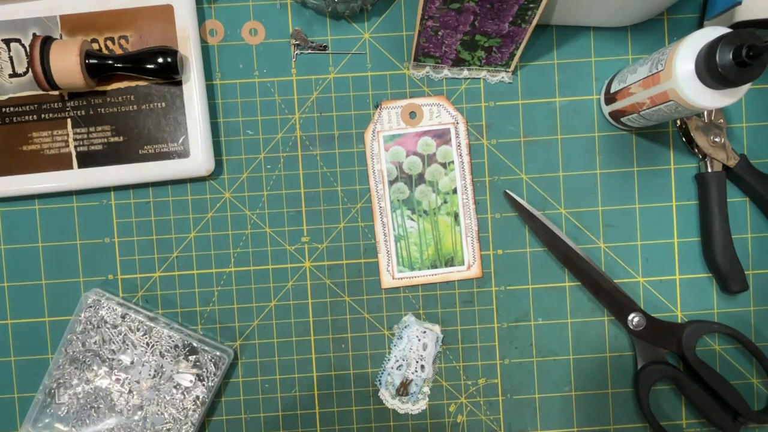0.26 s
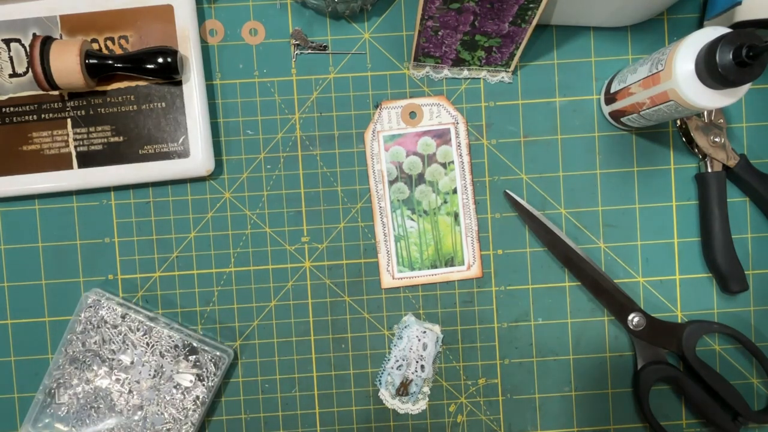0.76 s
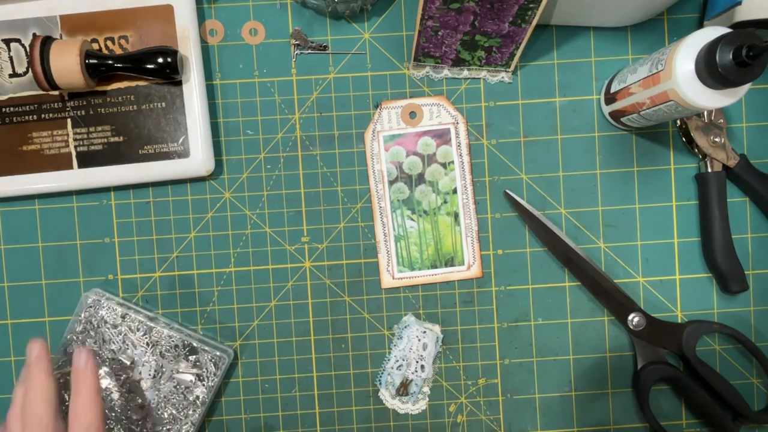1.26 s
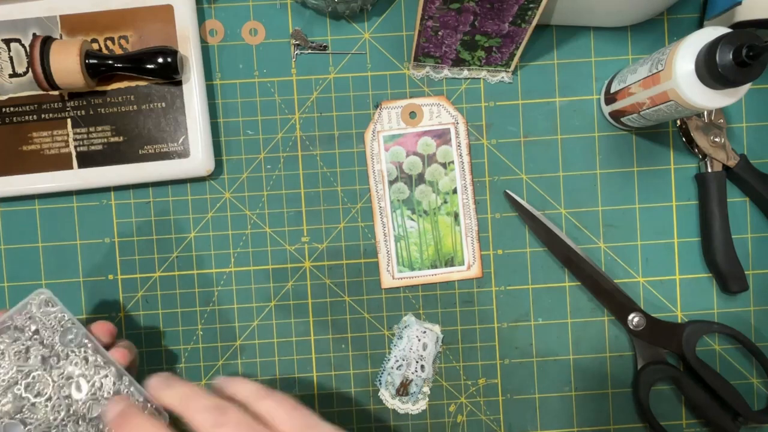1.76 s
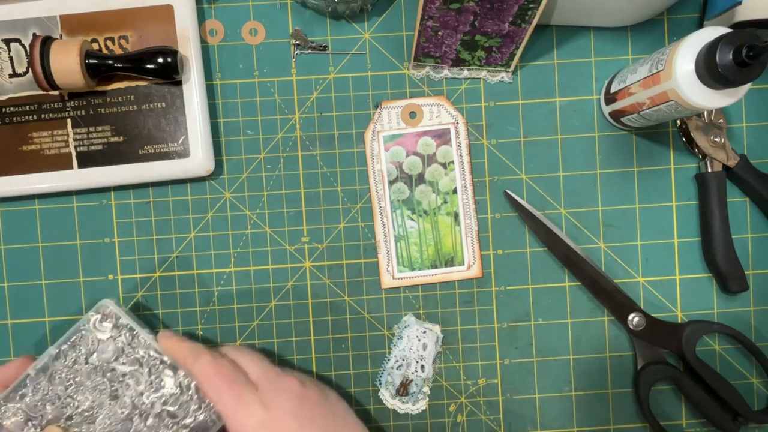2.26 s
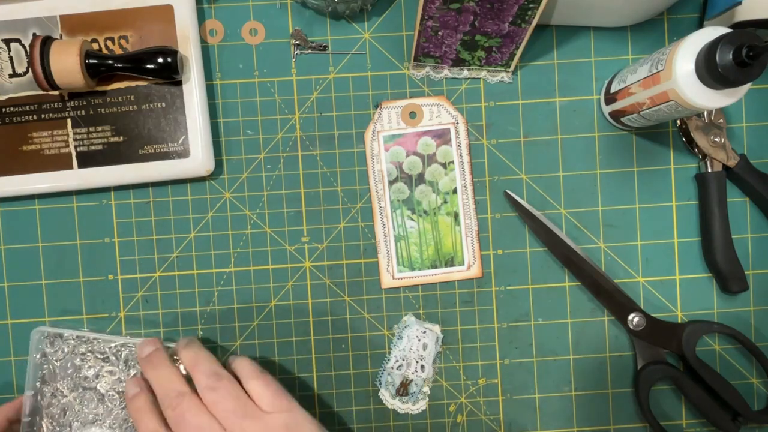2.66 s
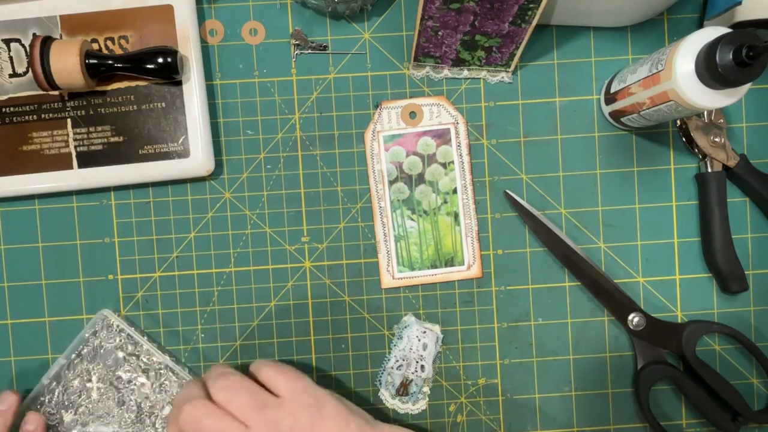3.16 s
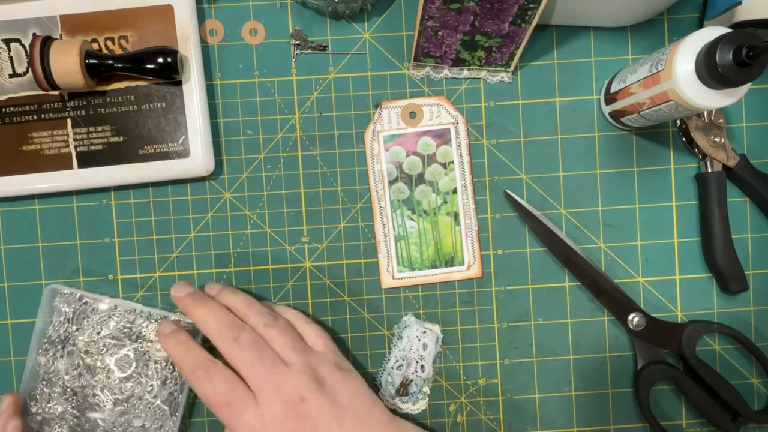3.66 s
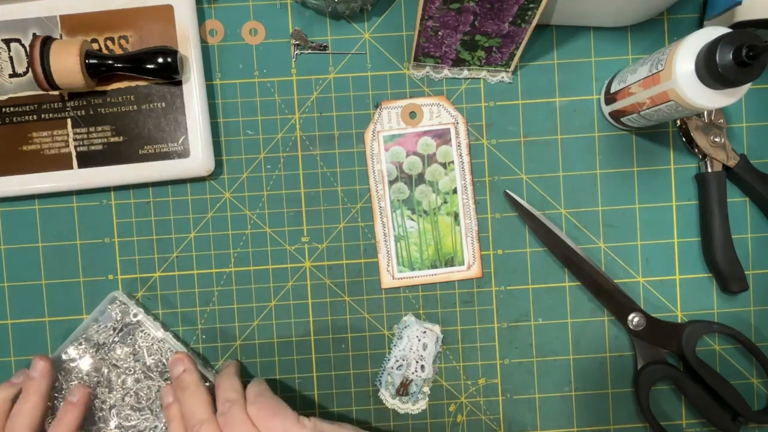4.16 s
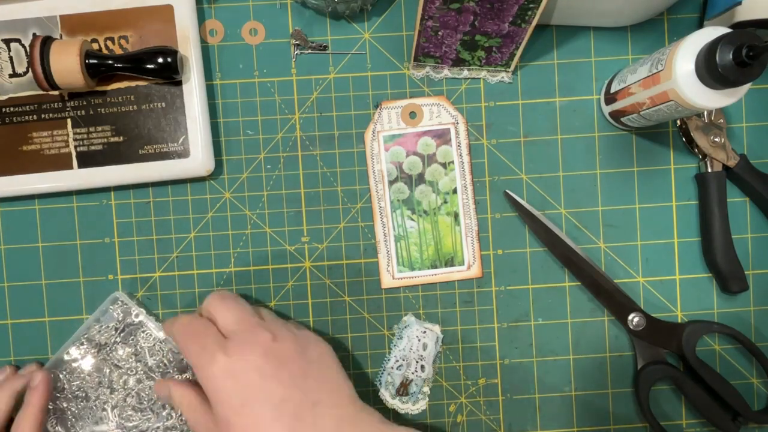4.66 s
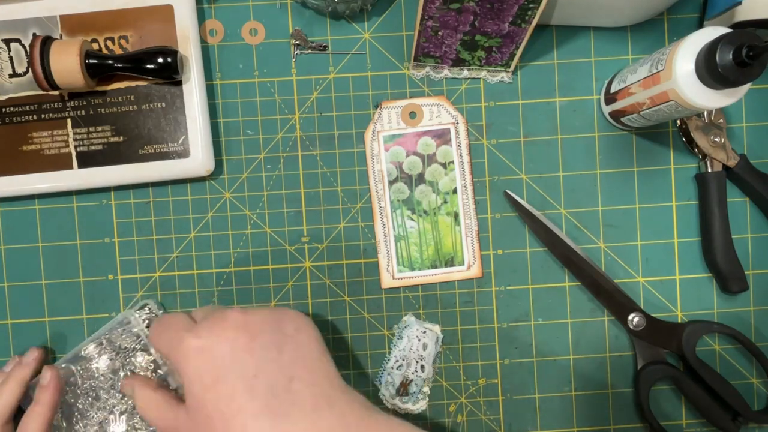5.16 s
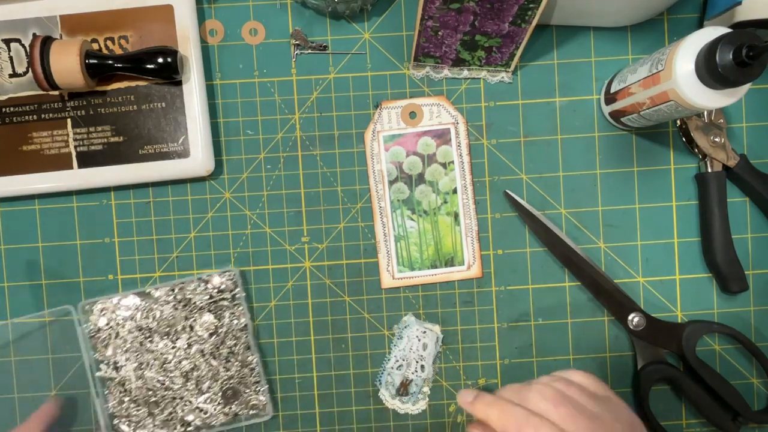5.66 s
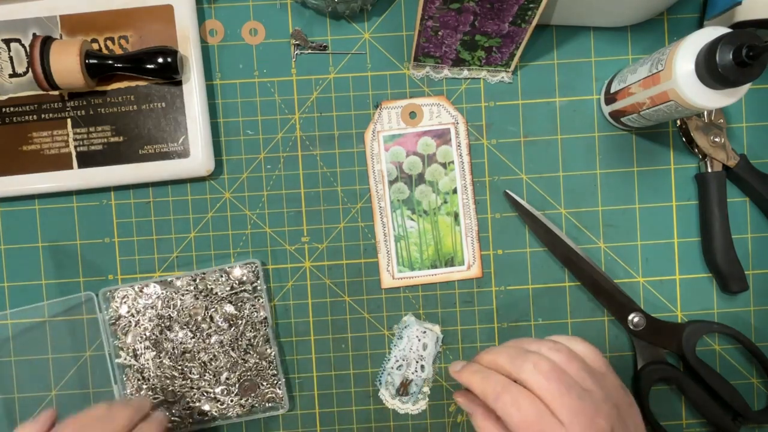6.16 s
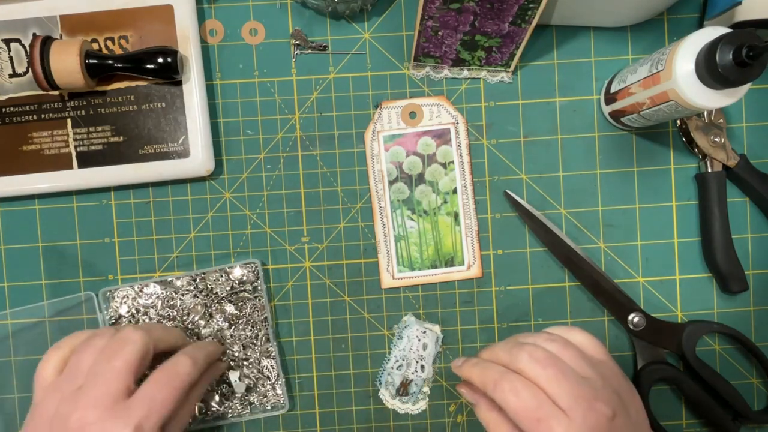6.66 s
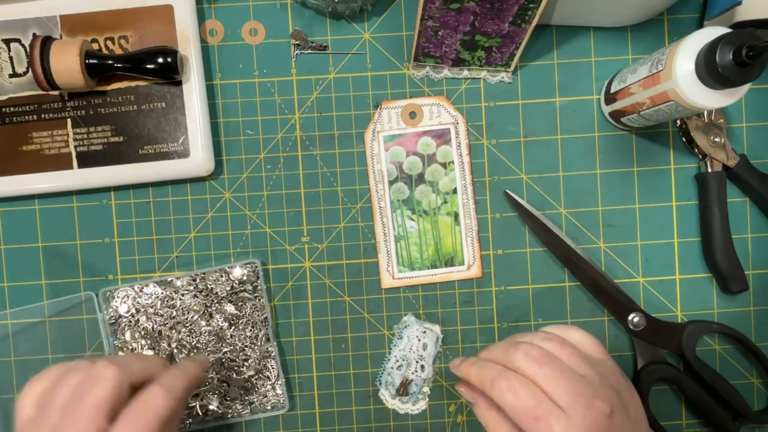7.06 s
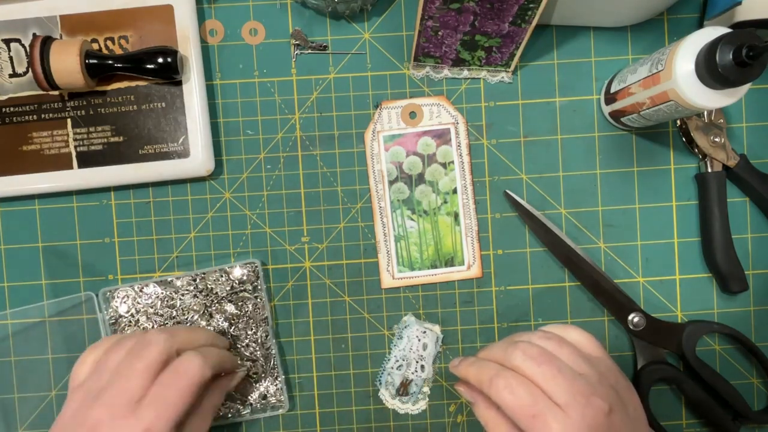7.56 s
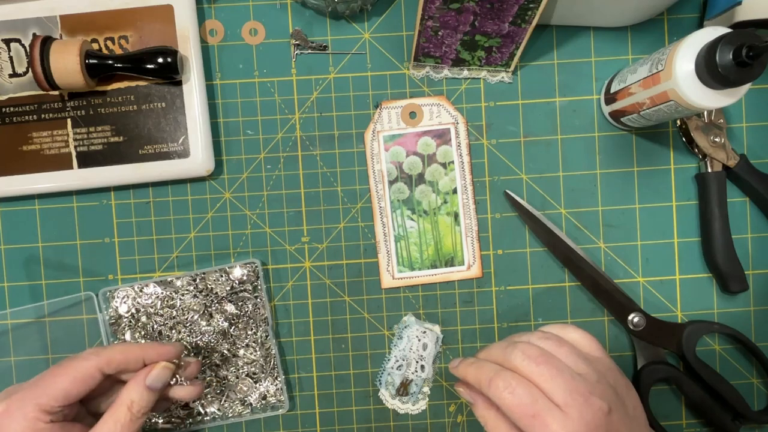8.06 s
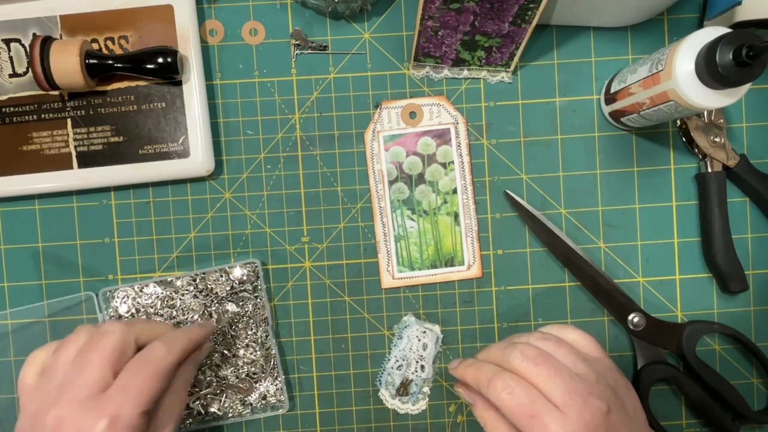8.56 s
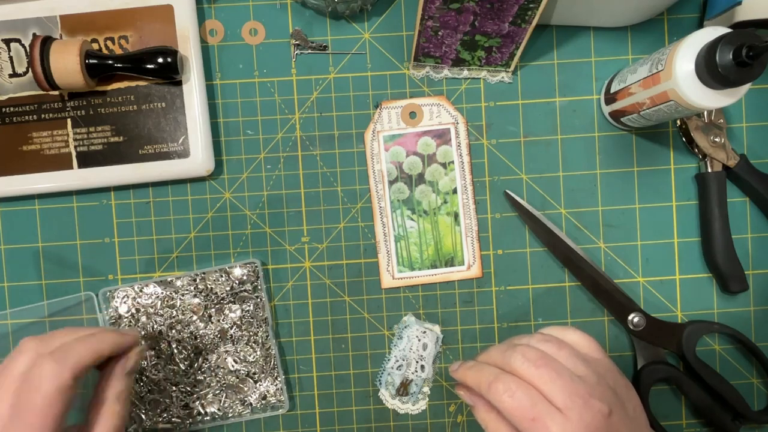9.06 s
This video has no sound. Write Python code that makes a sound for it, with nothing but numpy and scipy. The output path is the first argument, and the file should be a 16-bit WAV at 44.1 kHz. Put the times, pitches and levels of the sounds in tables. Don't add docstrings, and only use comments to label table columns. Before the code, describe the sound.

Close, dry stereo in a small quiet room with low hum and soft table rumble. From 0 to 0.6 s a plastic box scrapes gritty and hollow over a mat, then near quiet. At about 1.4 s it is lifted and shaken: dense metal charms crash against thin walls, loudest around 1.65 and 2.05 s, with buzzing lid hits. It lands at 2.4 to 2.5 s with a hard clack and low thud, and a last edge drops at 2.66 s. From 3 to 4.9 s come faint knocks, ticks and muffled bumps; a sharp snap opens it at 5.05 s. After light handling, fingers rake the heap from 6.3 to 7.55 s in bright, tinkling bursts with high pings and a barely audible squeak near 7 s. Isolated picks and drops click at 7.8, 7.95, 8.27 and 8.54 s, thinning to almost nothing after 9 s. Attacks are slightly smeared and watery.

```python
import sys
import numpy as np
from scipy import signal
from scipy.fft import rfft, irfft, next_fast_len
from scipy.io import wavfile
from scipy.ndimage import uniform_filter1d

SR = 44100
rng = np.random.default_rng(int(sys.argv[2]) if len(sys.argv) > 2 else 0)


def wav_record(signal):
    frames = np.transpose(np.atleast_2d(signal))
    bounded = np.clip(frames, -1, 1)
    quanta = np.round(bounded * 32767).astype(np.int16)
    wavfile.write(sys.argv[1], SR, quanta)


def field_ratio(decibels):
    return 10 ** (np.asarray(decibels, dtype=float) / 20)


N = 410571


def unit(x):
    return x / np.sqrt(np.mean(x ** 2) + 1e-20)


def along(points, hz):
    f, v = np.transpose(points)
    return np.interp(np.log(hz + 1), np.log(f + 1), v)


def level_curve(rows):
    s, db = np.transpose(rows)
    return np.interp(np.arange(N) / SR, s, db)


def coloured(x, spectrum):
    size = next_fast_len(N + 8192)
    points = [(0.79, -120)] + list(spectrum) + [(SR / 2, -120)]
    gain = field_ratio(along(points, np.fft.rfftfreq(size, 1 / SR)))
    return irfft(rfft(x, size) * unit(gain), size)[..., :N]


def contact_grains(per_s, spread_db):
    shared = .62
    hit = rng.random(N) < per_s / SR
    size = rng.standard_normal((3, N))
    both = np.sqrt(shared) * size[0] + np.sqrt(1 - shared) * size[1:]
    uneven = field_ratio(spread_db * np.minimum(rng.exponential(size=N), 4))
    return unit(hit * both * uneven)


def place(start, waves):
    at = start + np.arange(waves.shape[1])
    return np.bincount(at.ravel(), waves.ravel(), N + SR)[:N]


def ring(rows, t60_s, late_s, rise_s, gain_db):
    s, db, hz = np.transpose(rows)[:, :, None]
    t = np.arange(SR // 10) / SR
    decay = field_ratio(db + gain_db - 60 * t / np.clip(t60_s, .005, .3))
    attack = (1 - np.exp(-t / rise_s)) ** 2
    start = np.round((s + late_s) * SR).astype(int)
    return place(start, decay * attack * np.sin(2 * np.pi * hz * t))


# (time [s], level [dB])
STIRRING = [(.7, -77), (1.2, -67.5), (1.55, -51), (2.4, -51.5), (2.7, -60), (3.43, -77), (3.65, -62),
            (4.13, -78.5), (4.68, -65), (4.94, -71), (5.47, -57), (6.38, -77.5), (6.74, -53), (6.98, -67.5),
            (7.42, -58), (8.06, -77.5), (8.73, -68.5), (9.31, -75.5)]
# (peak time [s], level [dB], swell [s], settle [s])
SHAKEN_HEAPS = [(.85, -68.5, 0.011, 0.068), (1.08, -68.5, 0.11, 0.093), (1.246, -55, 0.037, 0.026),
                (1.325, -51, 0.0041, 0.016), (1.378, -40, .008, .012), (1.4, -46, .03, 0.035),
                (1.506, -22.5, 0.013, .023), (1.536, -26.5, 0.014, 0.011), (1.591, -25.5, 0.01, .0092),
                (1.648, -14, .017, 0.029), (1.69, -21, .012, 0.014), (1.736, -25, .007, .011),
                (1.816, -28, 0.008, 0.014), (1.908, -38, 0.0035, 0.0046), (1.945, -30, .006, 0.04),
                (1.993, -29.5, 0.0043, 0.014), (2.064, -14.5, .022, .016), (2.149, -25, 0.039, .018),
                (2.232, -37, 0.006, 0.007), (2.274, -31, 0.0027, .024), (2.302, -35, .0026, 0.022),
                (2.323, -38, 0.0027, .08)]
# (peak time [s], level [dB], wall re metal [dB], swell [s], settle [s])
HANDLED_HEAPS = [(1.415, -49, 8, .015, .012), (2.955, -45.5, -8.5, 0.0056, 0.0077),
                 (3.04, -56, -1, 0.048, 0.097), (3.196, -43, 7, 0.011, 0.01),
                 (3.281, -53.5, 9, .0017, 0.0063), (3.438, -55, 2.5, 0.051, 0.005),
                 (3.538, -49, 0, 0.062, .03), (3.632, -44, -0.5, 0.0042, 0.013),
                 (3.732, -60.5, 1.23, 0.0092, .02), (3.804, -53.5, -2.5, 0.003, 0.044),
                 (3.876, -48.5, 7, 0.0043, 0.0097), (4.007, -38.5, -6.5, 0.0028, 0.0075),
                 (4.095, -52.5, 7, 0.006, 0.0084), (4.476, -31.5, -3.5, 0.0056, 0.0064),
                 (4.529, -55.5, -5.5, 0.036, 0.034), (4.716, -46.5, -4.5, .015, .02),
                 (4.822, -43, 1, 0.0032, 0.013), (4.872, -50.5, 2, 0.009, .013),
                 (5.05, -14, -13, .005, .0068), (5.057, -34, -29, 0.01, 0.019),
                 (5.252, -47.5, -2.5, 0.0024, .042), (5.297, -54, 17, 0.011, 0.011),
                 (5.453, -54.5, -7.5, .05, 0.07), (5.592, -48.5, -9, 0.0087, .016),
                 (5.902, -54, -6.5, 0.042, 0.0084)]
# (peak time [s], level [dB], swell [s], settle [s])
RAKED_HEAPS = [(5.7, -56, .055, 0.041), (6.153, -64, 0.056, 0.044), (6.303, -34, .0051, 0.0079),
               (6.322, -37.5, 0.0076, 0.0077), (6.356, -28, 0.017, 0.023), (6.429, -41, 0.038, 0.006),
               (6.571, -23.5, 0.0069, 0.0089), (6.617, -26, 0.017, 0.016), (6.645, -21, .006, .007),
               (6.665, -24, 0.0088, .025), (6.734, -28.5, .006, .02), (6.775, -35.5, .015, .03),
               (6.835, -44.5, 0.036, 0.028), (6.875, -40.5, 0.0062, .023), (6.934, -43, .011, .0042),
               (7.025, -34.5, .004, 0.0071), (7.068, -36.5, .008, .012), (7.191, -22.5, 0.0091, 0.007),
               (7.23, -28, .02, 0.013), (7.253, -26, .0058, .012), (7.3, -40.5, .015, .0086),
               (7.374, -36, .012, .0095), (7.395, -29.5, 0.0038, 0.0093), (7.425, -36, .025, 0.027),
               (7.488, -31, .0055, .008), (7.53, -33, 0.039, 0.0097), (7.55, -26, 0.0087, .0053)]
# (peak time [s], level [dB], swell [s], settle [s])
PICKED_CHARMS = [(7.642, -42, 0.0098, 0.0052), (7.658, -33, .0039, 0.0062), (7.792, -28.5, 0.0051, 0.0088),
                 (7.954, -31, .003, .006), (8.012, -40, 0.032, 0.0046), (8.043, -50, 0.0052, 0.0035),
                 (8.266, -23, 0.005, 0.006), (8.278, -45.5, 0.016, 0.011), (8.538, -32, 0.0087, .012),
                 (8.7, -35, 0.007, .0076), (8.776, -34.5, .022, .0087), (8.851, -37.5, 0.022, 0.0012),
                 (8.87, -39.5, 0.018, 0.0059), (8.914, -45, .0225, .0023), (8.935, -39, .0086, 0.0067),
                 (9.214, -61, .03, 0.1)]
# (peak time [s], level [dB], swell [s], settle [s])
GRIP_SHIFTS = [(2.886, -57, .03, .008), (3.085, -55.5, 0.0048, .02), (3.769, -60, 0.016, 0.025),
               (3.934, -58.5, 0.034, 0.017), (3.985, -56, .01, .01), (4.14, -57, 0.01, 0.0073),
               (4.258, -62, 0.015, .015), (4.643, -55, .05, 0.04), (4.939, -67, 0.015, 0.018),
               (5.111, -53.5, 0.01, 0.023), (5.765, -56.5, 0.01, .003), (5.903, -47, .003, .004),
               (6.967, -53.5, 0.0058, .005), (7.723, -83.5, 0.0023, .013), (7.871, -61.5, 0.001, 0.0051),
               (8.119, -63.5, .01, .009), (9.072, -68, 0.0056, 0.014)]
# (peak time [s], level [dB], swell [s], settle [s])
SET_DOWNS = [
    (2.404, -18.5, 0.0091, .017),
    (2.499, -9.5, 0.0069, .012),
    (2.518, -35.5, .019, 0.023),
    (2.669, -23, 0.0048, 0.011),
    (2.691, -49.5, 0.038, 0.03),
]
# (time [s], level [dB])
SINGLE_TICKS = [(1.377, -35), (1.572, -30.5), (1.625, -22.5), (1.659, -17.5), (1.729, -25), (2.018, -30),
                (2.431, -30.5), (2.513, -21), (3.64, -43.5), (3.809, -47), (4.721, -46), (4.876, -48),
                (6.672, -25), (6.784, -38), (6.828, -41), (6.898, -39.5), (7.024, -37), (7.048, -43),
                (7.191, -23.5), (7.198, -26.5), (7.278, -35), (7.434, -35.5), (7.51, -35), (7.642, -37),
                (7.808, -38.5), (7.952, -33), (7.987, -40), (8.007, -33.5), (8.175, -65), (8.83, -41.5),
                (8.896, -48), (8.908, -49)]


def agitation():
    metal_db = level_curve(STIRRING)
    wall_db = -69.5 + 0.45 * (metal_db + 65)
    groups = [(SHAKEN_HEAPS, -12.5), (RAKED_HEAPS, -23.5), (PICKED_CHARMS, -22.5),
              (GRIP_SHIFTS, -2), (SET_DOWNS, -6.5)]
    heaps = list(HANDLED_HEAPS)
    for rows, re_db in groups:
        heaps += [(s, db, re_db, swell, settle) for s, db, swell, settle in rows]
    heaps += [(s, db, -23, 0.0024, .004) for s, db in SINGLE_TICKS]

    metal_power = np.pad(field_ratio(metal_db) ** 2, (0, SR))
    wall_power = np.pad(field_ratio(wall_db) ** 2, (0, SR))
    t = np.arange(-SR // 5, SR // 4) / SR
    for s, db, re_db, swell, settle in heaps:
        width = np.where(t < 0, .72 * swell, .92 * settle)
        heap = field_ratio(db) ** 2 * np.exp(-np.abs(t / width) ** 1.4)
        start = round(s * SR) - SR // 5
        metal_power[start:start + len(t)] += heap
        wall_power[start:start + len(t)] += heap * field_ratio(re_db) ** 2
    return np.sqrt(metal_power[:N]), np.sqrt(wall_power[:N])


# (frequency [Hz], density [dB per Hz])
METAL_COLOUR = [(590, -26.5), (1000, -54), (1700, -32.5), (1860, -20.5), (2600, -12), (4260, -6.5),
                (8480, -5.5), (9960, -6), (11000, -6.5), (12100, -5), (15600, -7.5)]


def clinks(metal, muffled, count=1600):
    when, pitch, life, size = rng.random((count, 4)).T
    busy = np.cumsum(np.sqrt(metal) * (1 - muffled))
    start = np.searchsorted(busy, when * busy[-1])
    hz = 2000 + 13500 * pitch
    db = 20 * np.log10(metal[start]) + along(METAL_COLOUR, hz) - 3 * np.log(size + .02)
    t60_s = .012 + .04 * life
    t = np.arange(SR // 34) / SR
    waves = field_ratio(db[:, None] - 60 * t / t60_s[:, None]) * np.sin(2 * np.pi * hz[:, None] * t)
    return place(start[:, None], waves)


# (frequency [Hz], density [dB per Hz])
MUFFLED_COLOUR = [(1000, -42.5), (1700, -3.5), (2080, -2.5), (2810, -1), (3740, -4), (13000, -17),
                  (15600, -25.5)]
# (frequency [Hz], density [dB per Hz])
WALL_COLOUR = [(120, -40), (200, -5.5), (467, 5), (585, 5.5), (1020, 10), (1470, 1), (1750, -13.5),
               (2010, -23), (2600, -21.5), (3380, -36.5), (5720, -120)]


def charms():
    metal, wall = agitation()
    contacts = contact_grains(7000, spread_db=2.2)
    muffled = wall ** 2 / (wall ** 2 + (field_ratio(-13.0) * metal) ** 2)
    bright = coloured(metal * np.sqrt(1 - muffled) * contacts, METAL_COLOUR)
    dull = coloured(metal * np.sqrt(muffled) * contacts, MUFFLED_COLOUR)
    rattle = coloured(wall * contacts, WALL_COLOUR)
    return field_ratio(-2.5) * (bright + dull) + field_ratio(.5) * rattle + field_ratio(-4.5) * clinks(metal, muffled)


# (time [s], level [dB], frequency [Hz])
CHARM_PINGS = [(2.345, -44, 10360), (4.869, -48.5, 4980), (5.271, -50, 5820), (6.419, -44.5, 14900),
               (6.641, -23, 11760), (6.674, -27, 10340), (6.684, -34.5, 13100), (6.765, -41.5, 12290),
               (6.78, -34.5, 12360), (6.813, -48, 15150), (6.821, -42.5, 12370), (6.837, -39, 12460),
               (6.848, -47.5, 15070), (6.88, -51, 15420), (6.896, -49, 13700), (6.917, -37.5, 15320),
               (7.186, -33, 4980), (7.272, -37, 12770), (7.368, -43.5, 12540), (7.39, -32, 13260),
               (7.5, -37.5, 10260), (7.511, -41.5, 8040), (7.636, -42.5, 11980), (7.947, -28.5, 12280),
               (7.95, -24, 15770), (7.983, -39, 12610), (8.003, -34.5, 12880), (8.527, -51, 15730),
               (8.542, -28, 13290), (8.553, -42, 4920), (8.82, -48.5, 9130)]


def pings():
    return ring(CHARM_PINGS, t60_s=.06, late_s=0, rise_s=.003, gain_db=7)


# (time [s],
# level [dB], frequency [Hz])
LID_STRIKES = [(1.486, -19, 3020), (1.499, -19, 2670), (1.503, -20.5, 2200), (1.519, -16.5, 1760),
               (1.524, -21.5, 2800), (1.532, -23.5, 1680), (1.541, -28, 2700), (1.581, -18.5, 913),
               (1.583, -23.5, 1490), (1.593, -25.5, 950), (1.632, -20, 2150), (1.642, -19, 5320),
               (1.652, -14.5, 5300), (1.651, -17.5, 2840), (1.661, -13.5, 2972), (1.662, -16, 5400),
               (1.676, -14, 1840), (1.693, -13, 1793), (1.718, -25.5, 2120), (2.03, -24.5, 2610),
               (2.055, -14.5, 2623), (2.147, -25, 1390), (2.275, -32, 2430), (2.497, -15, 2840),
               (4.469, -34.5, 1120), (4.47, -38, 2700), (5.043, -16, 1050), (5.044, -14.5, 2837),
               (5.052, -20.5, 2700), (5.29, -37, 500), (2.402, -22, 1100), (2.5, -13.5, 1050),
               (6.931, -41, 1714), (7.425, -36.5, 3100), (7.257, -43, 1480)]


def lid_hits():
    buzz = .85 + .55 * unit(uniform_filter1d(rng.standard_normal((2, N)), size=70))
    return buzz * ring(LID_STRIKES, t60_s=.03, late_s=0, rise_s=0.0025, gain_db=12.5)


# (time [s], peak level [dB], frequency [Hz])
BOX_KNOCKS = [(1.413, -40.5, 600), (1.493, -31, 772), (1.655, -19, 900), (1.665, -20.5, 430),
              (1.68, -17, 518), (1.582, -23, 700), (2.664, -20, 456), (3.046, -31.5, 300),
              (1.968, -37, 800), (2.015, -29, 1098), (2.345, -35.5, 702), (2.435, -27, 900),
              (3.212, -34, 805), (3.561, -35, 596), (5.112, -38.5, 909), (1.643, -20.5, 831),
              (1.9, -25, 803), (2.051, -11.5, 1367), (2.222, -28.5, 971), (2.266, -31.5, 1061),
              (2.399, -15.5, 1255), (2.498, -4.5, 1112), (2.664, -13, 317.8), (3.042, -27.5, 300.4),
              (3.19, -28.5, 890), (3.277, -38, 314), (3.502, -35.5, 493), (3.534, -29.5, 363.4),
              (3.624, -26.5, 222), (3.725, -37.5, 802), (3.871, -24.5, 520), (3.985, -32.5, 262.7),
              (4.468, -27.5, 1172), (4.704, -26.5, 224), (4.817, -32, 1028), (4.871, -37, 781),
              (5.042, -7.5, 992), (5.294, -27.5, 169.7), (5.712, -36.5, 242), (6.36, -37.5, 231),
              (7.181, -34, 292.7), (7.787, -33, 225), (8.525, -38.5, 244)]
# (pitch ratio [1], level [dB])
PANEL_MODES = [
    (.55, -28.5),
    (1, 3.5),
    (1.7, -11),
    (2.6, -10.5),
]


def knocks():
    rows = [(s, db + re_db, hz * ratio) for s, db, hz in BOX_KNOCKS for ratio, re_db in PANEL_MODES]
    return ring(rows, t60_s=0.039, late_s=0.0012, rise_s=0.0011, gain_db=-2.0)


# (time [s], scrape level [dB])
DRAG = [
    (0, -48),
    (.036, -65),
    (.15, -66.5),
    (.242, -36),
    (.344, -31),
    (.542, -34),
    (.594, -53),
    (.676, -55),
    (.8, -100),
]
# (time [s], level over the scrape [dB], width [s])
MAT_SNAGS = [
    (.112, 9.5, 0.026),
    (.285, 4.5, .012),
    (.345, 5, .008),
    (0.371, 1.5, 0.0093),
    (.41, -2.5, 0.017),
    (.435, 1.5, .01),
    (.485, 3, 0.0036),
    (.531, 0.5, .008),
]
# (frequency [Hz], density [dB per Hz])
GRIT_COLOUR = [(470, -6.5), (800, -9), (964, -7), (1060, -2.5), (1960, -2.5), (2990, 2), (7590, -5),
               (13900, -7.5), (15600, -12.5)]
# (frequency [Hz], density [dB per Hz])
BODY_COLOUR = [(47, -34), (80, -18), (140, 8.5), (201, 5), (960, 5.5), (1300, -8), (1690, -24.5),
               (2860, -120)]


def slide():
    t = np.arange(N) / SR
    scrape_db = level_curve(DRAG)
    for s, db, width in MAT_SNAGS:
        scrape_db = scrape_db + db * np.exp(-((t - s) / width) ** 2)
    body_db = -41 + 0.87 * (scrape_db + 32)
    grit = contact_grains(9000, spread_db=2.0)
    return coloured(field_ratio(scrape_db) * grit, GRIT_COLOUR) + coloured(field_ratio(body_db) * grit, BODY_COLOUR)


# (time [s], length [s], level [dB], start frequency [Hz])
FINGER_SLIPS = [
    (6.952, .045, -51, 1640),
    (7.025, .14, -56, 1580),
]


def squeak():
    sag_hz_per_s, fuzz_hz, catch_peak_db, catch_s = 250, 90, 3, .012
    flutter = unit(uniform_filter1d(rng.standard_normal((2, N)), size=90))
    out = 0
    for s, length, db, start_hz in FINGER_SLIPS:
        t = np.arange(N) / SR - s
        hz = start_hz - sag_hz_per_s * np.clip(t, 0, length) + fuzz_hz * flutter[0]
        touch = np.clip(np.minimum(t, length - t) / .006, 0, 1)
        catch_db = catch_peak_db * np.exp(-np.abs(t) / catch_s)
        tone = np.sin(2 * np.pi * np.cumsum(hz) / SR)
        out = out + field_ratio(db + catch_db + 2.9 * flutter[1]) * touch * tone
    return out


# (time [s], peak level [dB], frequency [Hz])
TABLE_BUMPS = [(.599, -44, 138.4), (.95, -45, 56), (.984, -46, 57.64), (1.001, -48.5, 58), (1.018, -49, 58),
               (1.035, -48.5, 58), (1.052, -48.5, 58), (1.069, -50, 58.45), (1.402, -39.5, 113.1),
               (2.024, -36.5, 143.6), (2.384, -25.5, 97.1), (2.483, -22, 92.9), (2.658, -20, 86.1),
               (2.759, -52.5, 66), (2.892, -42.5, 58.55), (3.277, -52.5, 73.8), (3.502, -52.5, 120),
               (3.721, -38, 72.9), (3.785, -35, 90.1), (3.93, -41, 43.1), (4.107, -45.5, 40.02),
               (4.699, -38, 93), (4.849, -45, 61.6), (5.11, -47.5, 66.8), (5.278, -38, 136.9),
               (5.671, -43.5, 77.1), (6.305, -57.5, 111.7), (6.34, -52, 226.1), (6.6, -49.5, 213),
               (6.68, -45.5, 298), (6.76, -49.5, 234), (7.177, -41, 93.5)]


def thuds():
    return ring(TABLE_BUMPS, t60_s=0.08, late_s=0.018, rise_s=0.00054, gain_db=6.5)


# (frequency [Hz], decay t60 [s])
ROOM_DECAY = [(200, 0.34), (900, 0.039), (2000, 0.11), (12000, .033)]


def room(x):
    hz, t, z = signal.stft(rng.standard_normal((2, SR // 3)), SR, nperseg=256)
    decay = field_ratio(-60 * t / along(ROOM_DECAY, hz)[:, None])
    tail = signal.istft(z * decay, SR, nperseg=256)[1]
    delayed = np.pad(x, ((0, 0), (300, 0)))
    return signal.fftconvolve(delayed, tail / np.linalg.norm(tail[0]), axes=1)[:, :N]


# (time [s], level [dB])
LEANING = [(0, -70), (.49, -54), (.75, -68.5), (.95, -63), (1.97, -63.5), (2.2, -70), (2.62, -73.5),
           (2.8, -57), (3.5, -59), (3.78, -49), (4.4, -65), (4.69, -49), (5.08, -62), (5.81, -58), (6, -65),
           (6.6, -59), (8.11, -64.5), (9.31, -66)]
# (frequency [Hz], density [dB per Hz])
RUMBLE_COLOUR = [(18, -37), (30, -5), (60, 3), (110, -5.5), (170, -21)]
# (frequency [Hz], density [dB per Hz])
HUM_COLOUR = [(59, -45), (100, -6), (134, -13), (170, 2), (205, -8), (333, -2.5), (371, -2), (729, -14.5),
              (1040, -16.5), (1630, -26.5), (3950, -43), (5780, -42.5), (15600, -39.5)]


def air():
    hiss = .75 * rng.standard_normal(N) + .65 * rng.standard_normal((2, N))
    hum = field_ratio(-60) * coloured(hiss, HUM_COLOUR)
    rumble = field_ratio(level_curve(LEANING)) * coloured(rng.standard_normal(N), RUMBLE_COLOUR)
    return hum + rumble


def scene():
    near = charms() + pings() + lid_hits() + knocks() + slide() + squeak() + thuds()
    heard = near + field_ratio(-18.5) * room(near) + air()
    return heard * field_ratio([[-.2], [.2]])


def smear(x, turns):
    z = signal.stft(x, nperseg=1024, noverlap=768)[2]
    field = rng.standard_normal(z.shape)
    for _ in range(2):
        field = uniform_filter1d(field, size=12, axis=1)
        field = uniform_filter1d(field, size=11, axis=2)
    turned = z * np.exp(2j * np.pi * turns * unit(field))
    out = signal.istft(turned, nperseg=1024, noverlap=768)[1][:, :N]
    return out * np.sqrt(np.mean(x ** 2) / np.mean(out ** 2))


def band_limit(x):
    return signal.sosfilt(signal.butter(12, 15750, fs=SR, output="sos"), x)


def record(dry):
    mix = np.clip(smear(dry, turns=.4), -1, 1)
    return band_limit(mix)


dry = scene()
out = record(dry)
wav_record(out)
```